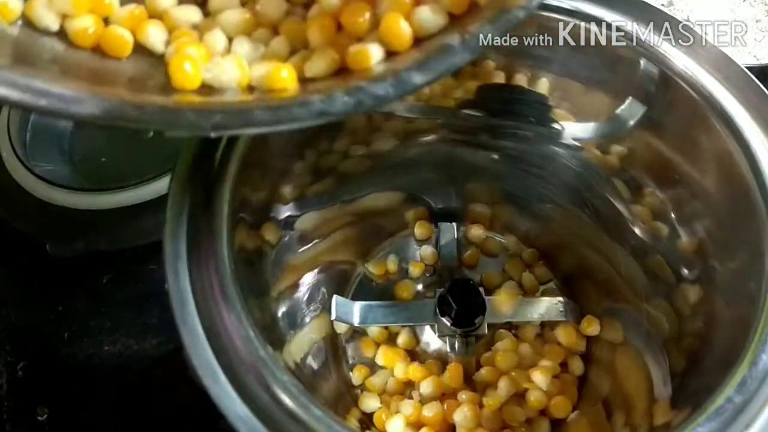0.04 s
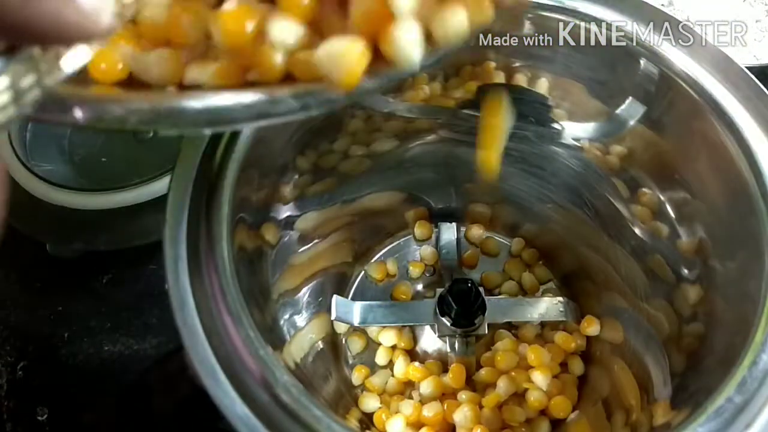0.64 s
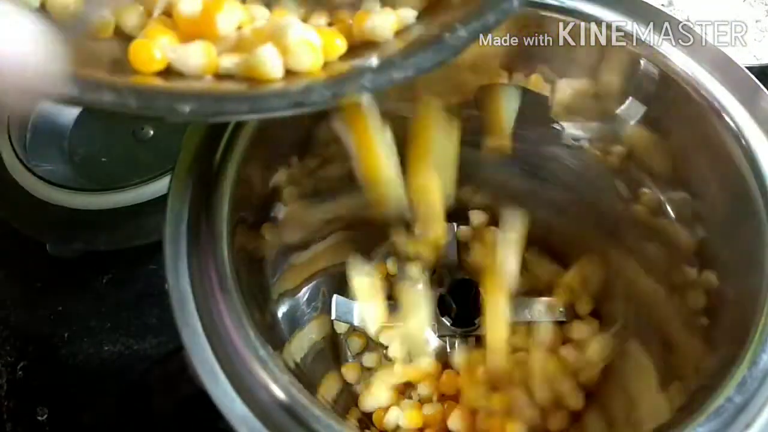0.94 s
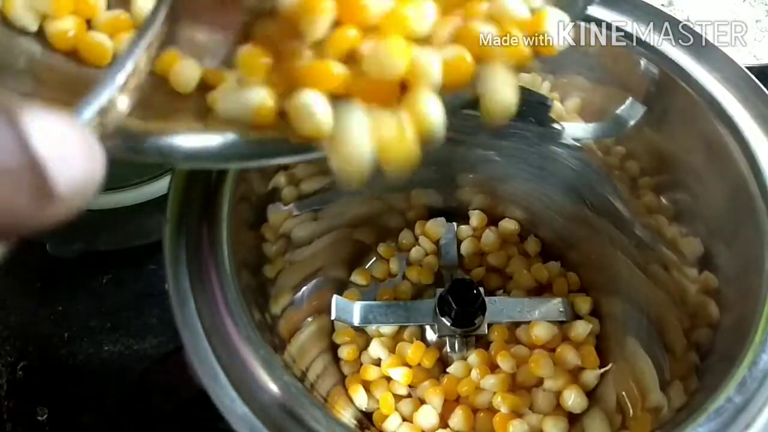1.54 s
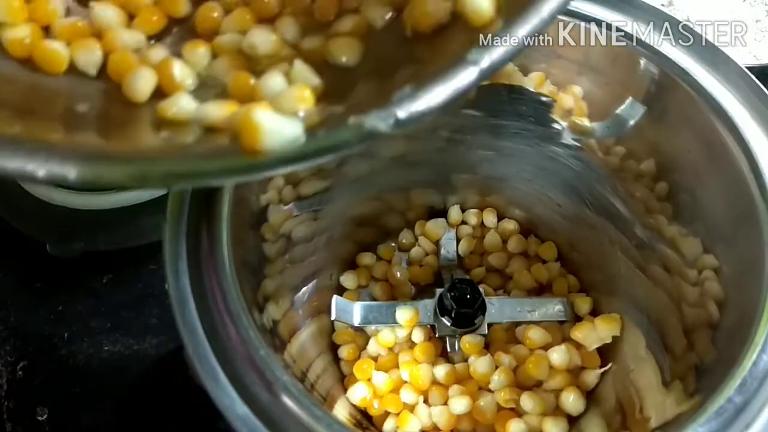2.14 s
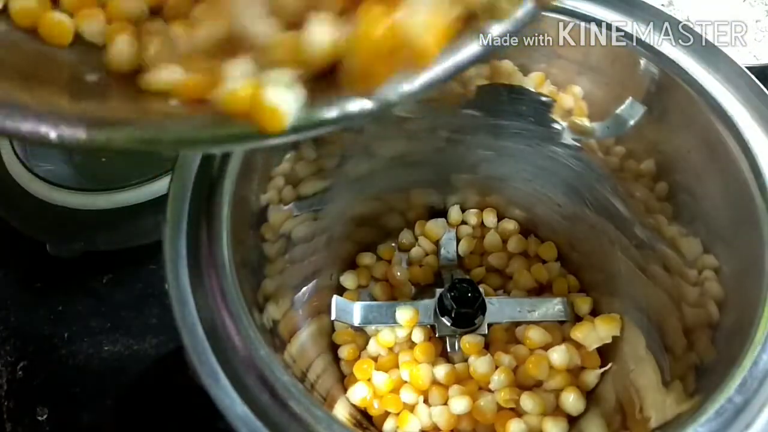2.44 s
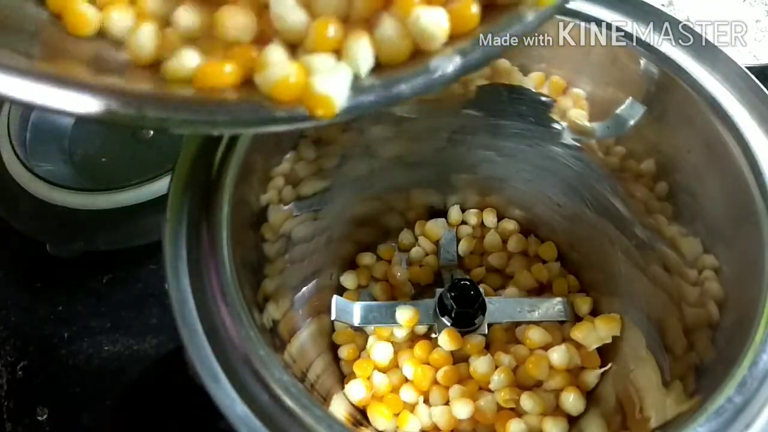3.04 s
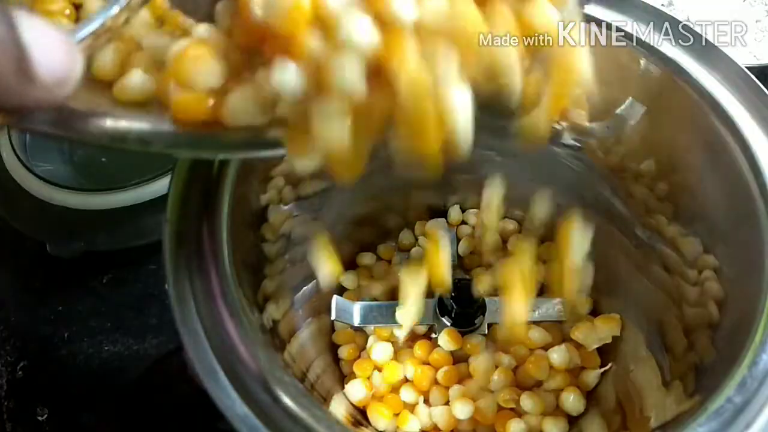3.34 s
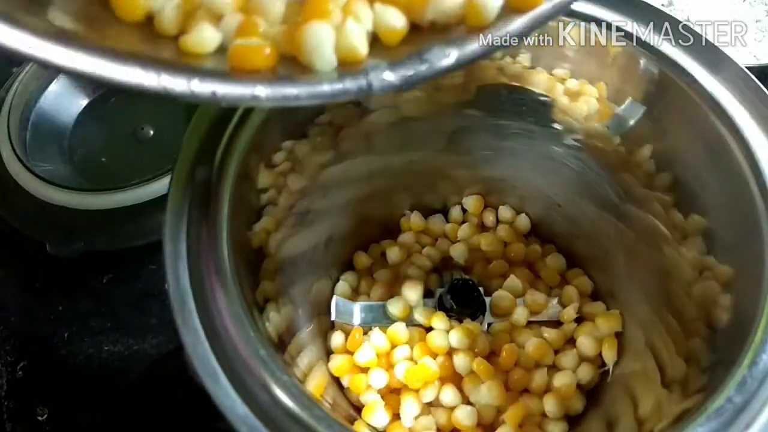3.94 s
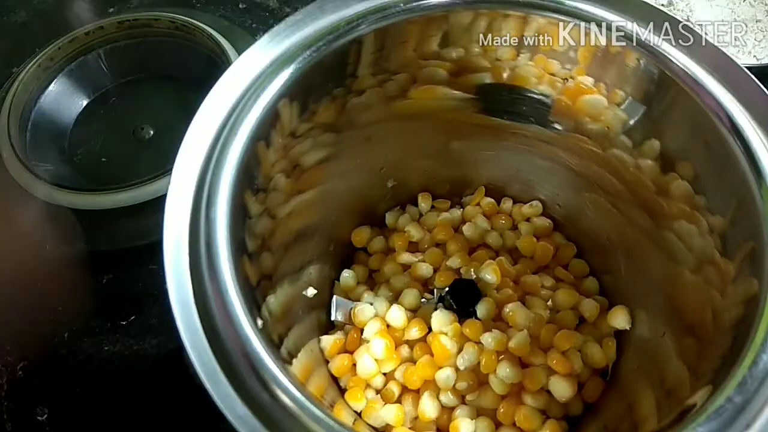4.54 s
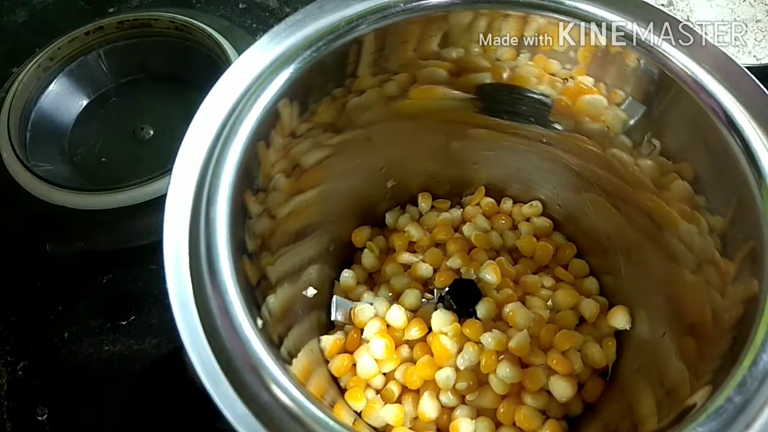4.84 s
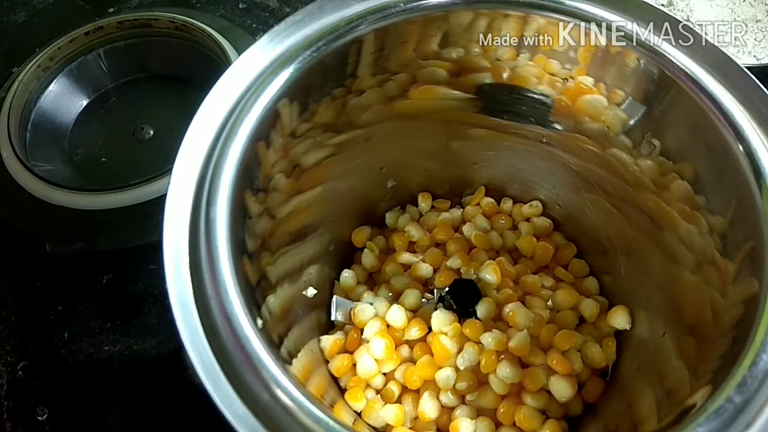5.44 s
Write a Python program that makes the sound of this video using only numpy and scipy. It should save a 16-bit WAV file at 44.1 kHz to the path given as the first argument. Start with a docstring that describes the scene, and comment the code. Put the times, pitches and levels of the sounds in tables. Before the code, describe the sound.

Close up in a small kitchen, soft corn kernels patter briefly into a steel jar, with dull handling bumps and a low rumble underneath. A steel plate clinks sharply at 0.4 and 1.4 seconds. Small loads of kernels tick and plop in around 0.9 and 1.8 seconds, making the jar ring faintly. From 2.2 to 3.1 seconds comes a run of bright clinks with two short, squeaky scrapes. A longer patter of corn falls from 3.4 to 3.9 seconds. Around 4 seconds the plate clinks and scrapes again as clumps land with soft, hollow knocks, and the last kernels drop near 4.5 seconds. At 4.7 seconds the ringing stops short, leaving faint room hush and a few low bumps. At about 5.6 seconds the plate is put down with a quick, bright metallic clatter.

```python
"""Boiled corn into a steel mixer jar

Kernels are pushed off a steel plate, close by, in a small kitchen. The plate clinks and scrapes
on steel; soft kernels patter into the jar and set its wall ringing. Handling thumps and rumbles
in the bass. After a pause the plate is put down with a clatter."""
import sys
import numpy as np
from scipy import signal
from scipy.fft import rfft, irfft, next_fast_len
from scipy.io import wavfile

SR = 44100
rng = np.random.default_rng(int(sys.argv[2]) if len(sys.argv) > 2 else 0)


def inscribe(sig):
    """Save sig as 16-bit PCM at rate SR to the path in sys.argv[1].

    A 1-D sig is mono; a 2-D sig holds one channel per row.
    Samples are clipped to [-1, 1] before scaling.
    """
    pcm = np.round(np.clip(np.atleast_2d(sig).T, -1, 1) * 32767)
    wavfile.write(sys.argv[1], SR, pcm.astype(np.int16))


N = 251762
TIME = np.arange(N) / SR
AGE = TIME[:SR]   # seconds since a blow
PAUSE_START_S, PAUSE_END_S = 4.735, 5.55

# Weaker modes of the jar wall. Each row: frequency in Hz, relative level in dB, t60 in seconds.
JAR_MODES = [(2702, -19, .16), (3055, -19, .28), (3488, -19, .32), (3728, -19, .25), (4080, -15, .22),
             (4270, -16, .12), (4627, -13, .12), (5211, -17, .15), (5303, -19, .2), (6100, -16, .12)]


def from_db(db):
    """Decibels to gain."""
    return 10 ** (np.asarray(db) / 20)


def unit_rms(x):
    """Scale to unit power."""
    return x / np.sqrt(np.mean(x ** 2) + 1e-20)


def at_hz(points, hz):
    """Read a table on a log-frequency axis."""
    point_hz, value = np.transpose(points)
    return np.interp(np.log(np.maximum(hz, 1)), np.log(point_hz), value)


def decay(t60_s):
    """One second of envelope, falling 60 dB per t60_s."""
    return from_db(-60 * AGE / t60_s)


def stroke(start_s, length_s, attack_s, sag_db_per_s, release_t60_s):
    """Envelope of a movement: swell, sag, release."""
    age = np.maximum(TIME - start_s, 0)
    fall_db = sag_db_per_s * age + 60 * np.maximum(age - length_s, 0) / release_t60_s
    return (1 - np.exp(-age / attack_s)) * from_db(-fall_db)


def wander(step_s):
    """One second of bounded random drift."""
    return np.interp(AGE / step_s, np.arange(200), np.clip(rng.standard_normal(200), -2, 1.5))


def add(out, start_s, sound):
    """Mix a stereo sound in at start_s."""
    at = max(round(start_s * SR), 0)
    out[:, at:at + sound.shape[1]] += sound[:, :N - at]


def butter(x, hz, kind, order=4):
    """Butterworth filter."""
    return signal.sosfilt(signal.butter(order, hz, kind, fs=SR, output="sos"), x)


def noise(colour, size, low_hz=0, high_hz=SR, nodes_db=0, node_spacing_hz=170, mode_spacing_hz=0):
    """Stereo noise, rms 1. A contact point favours some bands by nodes_db; mode spacing thins to tones."""
    # Each row: frequency in Hz, left-right correlation.
    likeness = [(150, 1), (350, 1), (700, 0.72), (1500, 0.044), (16000, 0.092)]
    # Each row: frequency in Hz, left minus right in dB.
    balance = [(200, -0.05), (700, -1.5), (1500, 0.6), (5000, 1.5), (9500, -1.5), (13000, 1.5)]
    length = next_fast_len(size)
    hz = np.fft.rfftfreq(length, 1 / SR)
    mid, side = rfft(rng.standard_normal((2, length)))
    nodes = np.interp(hz / node_spacing_hz, np.arange(400), np.minimum(rng.standard_normal(400), 1.2))
    alike, sides = at_hz(likeness, hz), np.array([[1], [-1]])
    spectrum = np.sqrt(1 + alike) * mid + np.sqrt(1 - alike) * side * sides
    gain = from_db(at_hz(colour, hz) + nodes_db * nodes + sides * at_hz(balance, hz) / 2)
    kept = (hz > max(low_hz, colour[0][0] / 2)) & (hz < min(high_hz, colour[-1][0] * 2))
    kept &= rng.random(len(hz)) * mode_spacing_hz < hz[1]
    return unit_rms(irfft(gain * kept * spectrum, length)[:, :size])


def ring(modes, scatter_db, apart_rad=np.pi / 2):
    """Struck modes with random strengths and phases, out of step between left and right."""
    out = np.zeros((2, SR))
    for hz, db, t60_s in modes:
        phase = rng.uniform(0, 2 * np.pi) + np.array([[0], [rng.choice([-1, 1]) * apart_rad]])
        gain = from_db(db + scatter_db * rng.standard_normal((2, 1)))
        age = AGE[AGE < t60_s]
        out[:, :len(age)] += gain * np.sin(2 * np.pi * hz * age + phase) * from_db(-60 * age / t60_s)
    return out


def grains(colour, per_s, skew_db, t60_s, nodes_db=0, dwell_s=0.03, spots=6):
    """Tiny uneven contacts wander over a few spots, each with its own noise burst; rms 1."""
    sizes = from_db(skew_db * np.minimum(rng.exponential(1, N), 3)) * rng.choice([-1, 1], N)
    clicks = sizes * (rng.random(N) < per_s / SR)
    spot = np.floor(TIME / dwell_s + rng.random(N)) % spots
    out = 0
    for k in range(spots):
        burst = noise(colour, SR // 10, nodes_db=nodes_db) * decay(t60_s)[:SR // 10]
        out += signal.oaconvolve((clicks * (spot == k))[None], burst, axes=1)[:, :N]
    return unit_rms(out)


def kernels(wall_swell_s=0.0054, fall_s=0.02):
    """Single kernels tick on steel and ring the wall; loads rustle, plop on the heap and ring the rim."""
    # Each row: start in seconds, tick in dB, its t60 in seconds, wall ring in relative dB.
    hits = [(0.0, -33.5, .1, -32), (0.7747, -33, .07, -52), (0.868, -41.5, 0.3, -47),
            (0.912, -26.5, 0.17, -38), (0.9481, -22, 0.21, -27), (0.987, -26, 0.18, -23.5),
            (1.1954, -28.5, .045, -47), (1.7355, -28.5, 0.071, -59), (1.8209, -21, 0.11, -22),
            (1.875, -31.5, 0.16, -27.5), (2.556, -34, 0.059, -73), (2.685, -28, 0.092, -23.5),
            (3.4102, -33.5, 0.17, -42), (3.4609, -31, 0.1, -47), (3.5107, -30, 0.18, -34.5),
            (3.534, -32.5, .08, -44.5), (3.5679, -20.5, 0.07, -28.5), (3.586, -42.5, 0.056, -24.5),
            (3.6564, -33.5, 0.04, -52.5), (3.7522, -27.5, 0.091, -29), (3.792, -32, 0.027, -47.5),
            (3.8178, -33, 0.097, -31), (3.8656, -29.5, 0.022, -45), (3.890, -22.5, .045, -35),
            (3.913, -25, 0.08, -26.5), (4.395, -45, 0.04, -55), (4.457, -37, 0.053, -50),
            (4.508, -39, 0.17, -63), (4.5318, -20, 0.088, -23.5), (4.5825, -21.5, 0.09, -30),
            (4.7, -30, 0.066, -68)]
    # Loads leave the plate. Each row: start and length in seconds, rustle and plops in dB.
    pours = [(-0.02, 0.028, -28.5, -40.5), (0.921, 0.18, -33, -38.5), (1.825, 0.069, -30.5, -55),
             (3.56, 0.31, -41.5, -49), (3.73, 0.18, -40.5, -48), (4.12, 0.27, -41.5, -81),
             (4.584, 0.15, -40, -47.5)]
    # Spectra of a kernel on steel and on the heap. Each row: frequency in Hz, density in dB.
    tick_colour = [(180, -45), (300, -26.5), (392, -3.5), (511, -31.5), (667, -4.5), (1190, -14.5),
                   (1870, -4), (2500, -2.5), (3000, -10.5), (4520, -6.5), (5700, -9.5), (7400, -7),
                   (10300, -4), (16000, -16)]
    plop_colour = [(300, -10.5), (400, -1.5), (480, -21.5), (690, 3.5), (800, 0.5), (1000, -9),
                   (1250, -8.5), (1700, -1), (2600, -38.5)]
    # Main wall notes and beating rim modes. Each row: frequency in Hz, relative dB, t60 in seconds.
    wall_modes = [(1910, -13, .17), (2219, -3, .2), (2238, -9, .14)]
    rim_modes = [(1491, -14, 1.2), (1514, -15, 1.2), (1652, 2, 1.05), (1733, -12, .6)]
    out = np.zeros((2, N))
    swell = 1 - np.exp(-AGE / wall_swell_s)
    for start_s, tick_db, t60_s, wall_db in hits:
        tick = from_db(tick_db) * noise(tick_colour, SR, nodes_db=8) * decay(t60_s)
        wall = ring(wall_modes, scatter_db=6.8) + from_db(-4) * ring(JAR_MODES, scatter_db=2)
        add(out, start_s, tick + from_db(wall_db + 3) * wall * swell)
    held = TIME < PAUSE_START_S
    rustle, plops = from_db(-58) * held, from_db(-56) * held   # faint shifting between loads
    for start_s, length_s, rustle_db, plop_db in pours:
        rustle += from_db(rustle_db) * stroke(start_s, length_s, 0.011, 50, release_t60_s=0.31)
        plops += from_db(plop_db) * stroke(start_s, length_s, 0.031, 28, release_t60_s=0.9)
        rim = ring(rim_modes, scatter_db=0, apart_rad=2.1) * swell
        add(out, start_s + fall_s, from_db(rustle_db - 2.5) * rim)
    out += rustle * grains(tick_colour, per_s=450, skew_db=4.5, t60_s=0.03, nodes_db=6)
    out += from_db(-6.5) * wall_patter(rustle)
    return out + plops * grains(plop_colour, per_s=360, skew_db=3, t60_s=0.12, nodes_db=4)


def wall_patter(flow, per_s=220):
    """Falling kernels keep striking the jar wall; its modes build up and ring on."""
    strikes = flow * rng.choice([-1, 1], N) * (rng.random(N) < per_s / SR)
    return signal.oaconvolve(strikes[None], ring(JAR_MODES, scatter_db=3), axes=1)[:, :N]


def handling(rumble_peak_hz=141, bump_t60_s=0.093, bump_swell_s=0.0054):
    """Dull bumps over a lumpy rumble that lasts while the plate is held and swells as the grip shifts."""
    # Each row: start and length in seconds, relative level in dB.
    grips = [(2.403, 0.19, -34), (4.266, 0.58, -50), (4.996, 0.18, -37)]
    # Each row: start in seconds, relative level in dB, pitch in Hz.
    bumps = [(0.059, -24.5, 150), (0.159, -28.5, 160), (0.262, -29.5, 160), (0.369, -27.5, 150),
             (1.262, -34.5, 170), (1.457, -38, 170), (1.652, -34, 170), (1.739, -27.5, 180),
             (1.754, -28, 240), (2.106, -43, 150), (2.222, -32, 140), (2.695, -27, 140),
             (4.266, -28.5, 173), (4.335, -38.5, 190), (4.879, -32.5, 140), (5.03, -25, 140),
             (5.341, -40.5, 140)]
    # Each row: frequency in Hz, density in dB.
    rumble_colour = [(15, -60.5), (25, -7.5), (54, -33.5), (123, -2), (141, 5), (243, -7.5), (281, -15.5),
                     (392, -12), (425, -49), (600, -38), (780, -42.5), (1320, -120)]
    level = from_db(-47) * stroke(0, PAUSE_START_S, 0.003, 0.4, release_t60_s=0.51)
    for start_s, length_s, db in grips:
        level += from_db(db) * stroke(start_s, length_s, 0.014, 45, release_t60_s=0.77)
    out = level * grains(rumble_colour, per_s=140, skew_db=-0.44, t60_s=0.17)
    envelope = decay(bump_t60_s) * (1 - np.exp(-AGE / bump_swell_s))
    for start_s, db, pitch_hz in bumps:
        colour = [(hz * pitch_hz / rumble_peak_hz, density) for hz, density in rumble_colour]
        add(out, start_s, from_db(db) * noise(colour, SR) * envelope)
    return from_db(-1) * butter(out, 650, "low")


def room_hush(level_db=-60):
    """Steady, faint background noise."""
    # Each row: frequency in Hz, density in dB.
    colour = [(15, -29), (25, -28.5), (180, 3.5), (463, -17), (624, -7), (714, -11.5), (887, -11),
              (1440, -14.5), (1560, -28.5), (1740, -4.5), (3430, -27.5), (8590, -36.5), (9320, -44.5),
              (10400, -30.5), (16000, -53)]
    return from_db(level_db) * noise(colour, N)


def hisses():
    """A faint high hiss swells ahead of some clinks."""
    # Each row: start and length in seconds, level in dB.
    swells = [(0.232, 0.17, -50), (2.036, 0.17, -54), (5.417, 0.021, -61)]
    # Each row: frequency in Hz, density in dB.
    colour = [(6000, -23.5), (8000, -8), (9500, 0.5), (11000, -3), (14000, -23)]
    level = sum(from_db(db) * stroke(start_s, length_s, 0.026, 9.5, release_t60_s=0.22)
                for start_s, length_s, db in swells)
    return level * noise(colour, N)


def clinks(chatter_t60_s=0.232, damped_t60_s=0.082, shimmer_t60_s=0.43):
    """Steel on steel: a hard touch, brief chatter, then the hand damps the crash; high modes ring on."""
    # Each row: start in seconds, treble and body clank in relative dB, chatter length in seconds.
    knocks = [(0.3776, -8, -23, 0.014), (1.363, -11.5, -24, 0.012), (2.2414, -10, -24.5, 0.0094),
              (2.294, -19.5, -41, 0.011), (2.334, -16.5, -36, 0.0074), (2.384, -23, -30.5, 0.0064),
              (2.816, -7, -21.5, 0.01), (2.892, -11.5, -44, 0.0073), (2.9504, -9, -49.5, 0.009),
              (3.097, -8, -20, 0.007), (3.9895, -11, -24, 0.008), (4.0387, -6, -21.5, 0.012),
              (4.0881, -18.5, -30.5, 0.0089), (4.1088, -17.5, -29, 0.0088), (4.15, -24.5, -57, .012)]
    # Spectra of the crash and of the plate's weaker modes. Each row: frequency in Hz, density in dB.
    crash_colour = [(150, -24.5), (250, -9.5), (493, -8.5), (662, -2), (1220, -18), (1490, 3.5), (1810, -6),
                    (1970, 0.5), (2220, -9.5), (2600, 1), (3400, -0.5), (4100, -3.5), (5070, -11.5),
                    (5830, 0), (7400, -3.5), (9830, 3.5), (14900, -11.5), (16000, -10)]
    shimmer_colour = [(1400, -12), (2500, -10), (4400, -22), (6300, 1), (7400, -7), (8700, 1.5),
                      (10500, 4.5), (12000, -6), (14000, -7.5), (16000, -15.5)]
    # Held plate. Each row: frequency in Hz, relative level in dB, t60 in seconds.
    plate_modes = [(1550, -14, 0.051), (1700, -13.5, 0.32), (2610, -10.5, .17), (3390, -11.5, 0.12),
                   (3870, -14.5, 0.181), (5800, -6, 0.14), (8500, -10, 0.51), (9520, -8.5, 0.41),
                   (10340, -3.5, .35), (10500, -9, 0.3), (11200, -9, 0.43), (12800, -12.5, 0.41)]
    out = np.zeros((2, N))
    first_touch = 0.36 * decay(0.024)
    for start_s, treble_db, clank_db, chatter_s in knocks:
        treble = from_db(treble_db) * noise(crash_colour, SR, low_hz=7900, nodes_db=10)
        mids = from_db(clank_db + 3.5) * noise(crash_colour, SR, low_hz=4220, high_hz=7300, nodes_db=7.5)
        body = from_db(clank_db + 3) * noise(crash_colour, SR, high_hz=4170, nodes_db=5)
        chatter = decay(chatter_t60_s) * np.interp(AGE - chatter_s, AGE, decay(damped_t60_s))
        crash = (treble + mids + body) * (chatter + first_touch) * (1 - decay(0.0029))
        shimmer = noise(shimmer_colour, SR, nodes_db=8.5, mode_spacing_hz=77.6) * decay(shimmer_t60_s)
        ringing = from_db(-20.5) * shimmer + from_db(-16) * ring(plate_modes, scatter_db=2.5)
        add(out, start_s, crash + from_db(treble_db) * ringing)
    return out


def scrapes():
    """The edge bites and rings, then slides: dense slips rasp and sing under the hand's pressure."""
    # Each row: start and length in seconds, then bite, rasp, squeal and mid-stroke swell in dB.
    slides = [(2.239, 0.11, -15, -20, -19, -1.5), (2.814, 0.21, -12.5, -29, -21, 6),
              (3.988, 0.03, -15, -27, -27, 0.5), (4.041, 0.109, -23, -37, -30.5, 4)]
    # Spectrum of a slip. Each row: frequency in Hz, density in dB.
    slip_colour = [(300, -10.5), (700, 0), (1100, -10), (1650, -13.5), (2900, -13), (4500, -17.5),
                   (6000, -10.5), (8000, 5), (9900, -3), (11000, 0.5), (12000, -4.5), (13000, 1),
                   (14700, -3), (16000, -12.5)]
    # Each row: frequency in Hz, relative level in dB, t60 in seconds.
    bite_modes = [(1700, -8, .1), (2460, -4, .06), (3630, -5, .07), (4450, -7, .06), (8330, -3, .07)]
    friction, singing = np.zeros(N), np.zeros((2, N))
    for start_s, length_s, bite_db, rasp_db, squeal_db, swell_db in slides:
        progress = np.clip((TIME - start_s) / length_s, 0, 1)
        pressure = from_db(swell_db * np.sin(np.pi * progress ** 1.3))
        sliding = pressure * stroke(start_s, length_s, 0.016, 3, release_t60_s=0.065)
        biting = stroke(start_s, length_s, 0.003, 418.5, release_t60_s=0.13)
        friction += from_db(rasp_db) * sliding + from_db(bite_db) * biting
        tones = np.zeros((2, N))
        add(tones, start_s, squeal())
        singing += from_db(squeal_db) * sliding * tones
        add(singing, start_s, from_db(bite_db) * ring(bite_modes, scatter_db=3) * (1 - decay(0.014)))
    slips = grains(slip_colour, per_s=510, skew_db=-1.5, t60_s=0.024, nodes_db=11, dwell_s=0.06, spots=3)
    return friction * butter(slips, 600, "high") + singing


def squeal(flicker_db=8, glide_share=0.014, glide_below_hz=7500, top_bend_hz=22):
    """The travelling contact pumps narrow resonances in turn and bends them, the highest least."""
    # Each row: frequency and width in Hz, relative level in dB.
    resonances = [(1705, 45, -10), (2460, 60, -9), (2595, 45, -10), (3120, 45, -12), (3320, 70, -9),
                  (3860, 55, -1), (4450, 90, -6), (4850, 40, -11), (5340, 70, -4), (5720, 45, -8),
                  (6060, 100, -1), (6370, 45, -7), (7800, 120, -9), (8380, 110, -6), (9090, 50, -6),
                  (9370, 80, -4), (9620, 45, 2), (9735, 40, 3), (9866, 40, 1), (10120, 130, 1),
                  (11150, 110, -6), (12770, 70, -1), (12980, 70, -4), (14450, 200, -8)]
    real, imaginary = rng.standard_normal((2, 2, SR))
    out = 0
    for hz, width_hz, db in resonances:
        pole = np.exp(-np.pi * width_hz / SR)
        drive = np.roll(real + 1j * imaginary, rng.integers(SR), axis=1)
        swing = signal.lfilter([(1 - pole) ** 2], [1, -2 * pole, pole * pole], drive)
        bend_hz = glide_share * hz if hz < glide_below_hz else top_bend_hz
        phase = 2 * np.pi * np.cumsum(hz + bend_hz * wander(step_s=0.045)) / SR
        out += from_db(db + flicker_db * wander(step_s=0.032)) * (swing * np.exp(1j * phase)).real
    return unit_rms(out)


def clumps():
    """Clumps land on the heap and sound the air in the jar: soft, hollow knocks."""
    # Each row: start in seconds, level in dB.
    landings = [(3.465, -30.5), (3.9905, -22.5), (4.014, -30), (4.091, -22.5), (4.113, -20.5), (4.62, -37),
                (4.71, -35.5)]
    # Each row: frequency in Hz, relative level in dB, t60 in seconds.
    air_modes = [(659, 0, 0.045), (714, 2, 0.067), (875, -11, 0.033)]
    out = np.zeros((2, N))
    for start_s, db in landings:
        add(out, start_s, from_db(db) * ring(air_modes, scatter_db=2) * (1 - decay(0.026)))
    return out


def pause(depth_db=-34, fade_s=0.013):
    """Gain dip that stops the ringing short and lasts until the plate is put down."""
    corners_s = [PAUSE_START_S, PAUSE_START_S + fade_s, PAUSE_END_S - fade_s, PAUSE_END_S]
    return from_db(np.interp(TIME, corners_s, [0, depth_db, depth_db, 0]))


def set_down():
    """The plate lands on one edge and rattles flat, ringing freely; it carries no bass."""
    # Each row: start in seconds, treble and low ring in relative dB, crash t60 in seconds.
    bounces = [(5.554, -22.5, -16, 0.16), (5.572, -16.5, -31, 0.15), (5.6324, -9.5, -46, 0.09),
               (5.644, -9.5, -15, 0.13), (5.663, -11.5, -18, 0.11), (5.68, -16, -30, 0.48)]
    # Each row: frequency in Hz, density in dB.
    crash_colour = [(240, -39), (450, -13.5), (760, -27), (1000, -23), (1310, -29.5), (1600, -12),
                    (1950, -9), (2700, -12.5), (3370, -19), (3930, -14), (4700, -17), (5700, -15),
                    (6440, -16.5), (7400, -17), (8500, -8), (10100, -3), (12100, -9), (15000, -17),
                    (16000, -18)]
    # Free plate. Each row: frequency in Hz, relative level in dB, t60 in seconds.
    low_modes = [(1711, -7, .12), (1732, -1, .15), (2099, -15, .2), (2676, -17, .2), (3835, -16, .2),
                 (6035, -21, .3), (7357, -17, .35)]
    high_modes = [(7991, -5, .25), (8275, -6, .3), (8450, 0, .28), (8926, 0, .25), (9074, -4, .3),
                  (9741, -4, .25), (10103, 1, .25), (10296, 0, .28), (10864, -8, .25), (11050, -4, .25),
                  (12150, -3, .35)]
    out = np.zeros((2, N))
    for start_s, treble_db, low_db, t60_s in bounces:
        crash = from_db(treble_db + 1) * noise(crash_colour, SR, nodes_db=3, mode_spacing_hz=57)
        high = from_db(treble_db - 12) * ring(high_modes, scatter_db=6)
        low = from_db(low_db) * ring(low_modes, scatter_db=3.5) * (1 - decay(0.0077))
        add(out, start_s, crash * decay(t60_s) + high + low)
    return butter(out, 600, "high")


def kitchen(x, wet_db=-10, build_s=0.00088):
    """Hard walls return a diffuse tail that dies soonest in the treble."""
    # Each row: frequency in Hz, t60 in seconds.
    room_t60 = [(300, 0.61), (2000, 0.63), (6000, 0.34), (10000, 0.41), (15000, 0.31)]
    edges_hz = np.geomspace(200, 17000, 10)
    white, tail = rng.standard_normal((2, SR)), 0
    for low, high in zip(edges_hz, edges_hz[1:]):
        tail += butter(white, [low, high], "band", order=2) * decay(at_hz(room_t60, np.sqrt(low * high)))
    tail = unit_rms(tail * (1 - np.exp(-AGE / build_s))) / np.sqrt(SR)
    return from_db(wet_db) * signal.fftconvolve(x, tail, axes=1)[:, :N]


def scene():
    """Steel and corn in the kitchen, over handling noise and room hush."""
    steel = clinks() + scrapes() + set_down()
    corn = kernels() + clumps()
    room = kitchen(steel + from_db(-3) * corn)   # the jar shields the room from the kernels
    return from_db(-2.5) * (steel + corn + room) * pause() + hisses() + handling() + room_hush()


def record(dry, low_cut_hz=65, top_cut_hz=16300):
    """A small microphone loses the deep bass; peaks are rounded off and the top is cut."""
    rounded = np.tanh(butter(dry, low_cut_hz, "high", order=2))
    return signal.sosfilt(signal.cheby2(16, 60, top_cut_hz, fs=SR, output="sos"), rounded)


dry = scene()
out = record(dry)
inscribe(out)
```